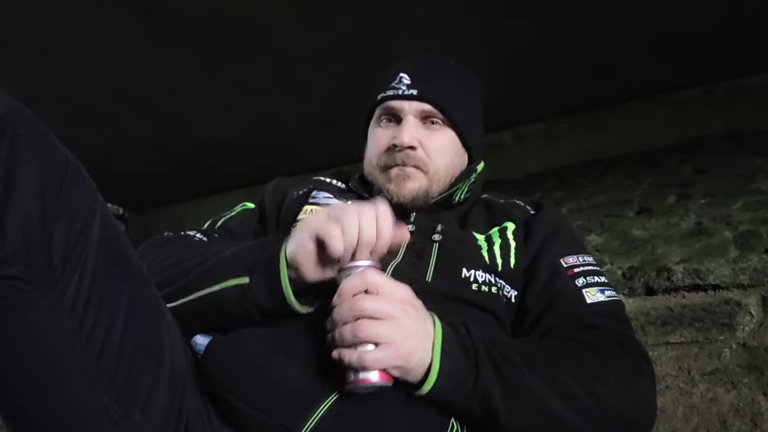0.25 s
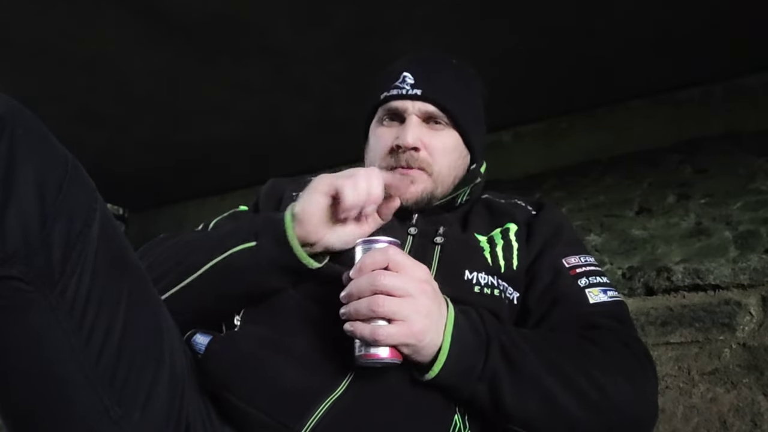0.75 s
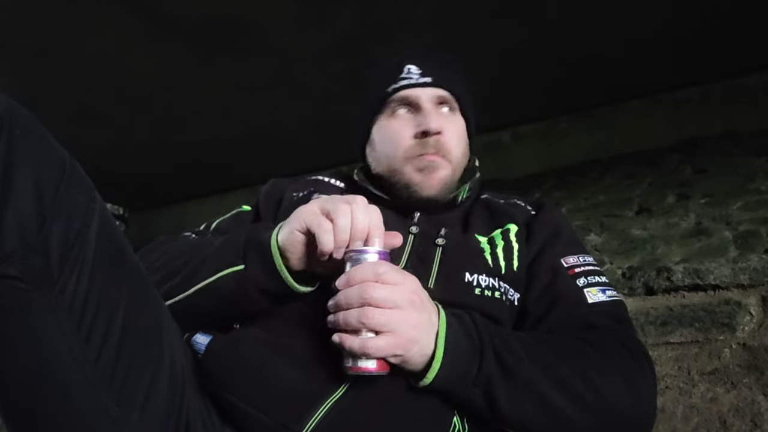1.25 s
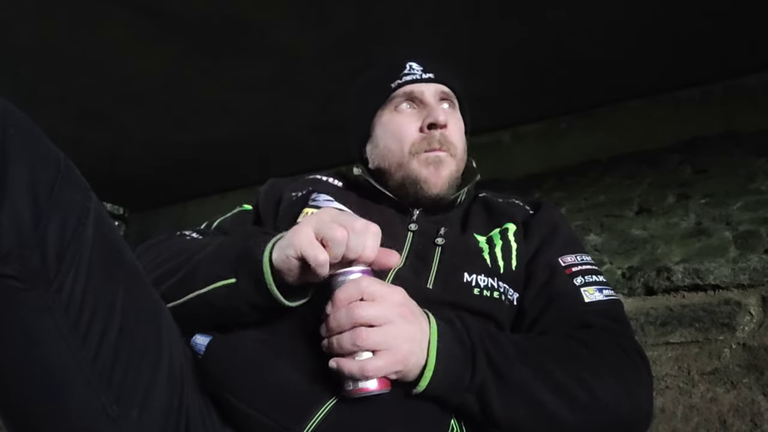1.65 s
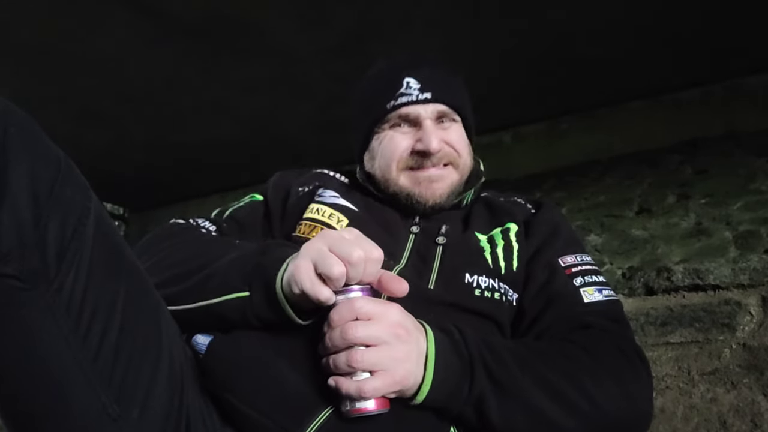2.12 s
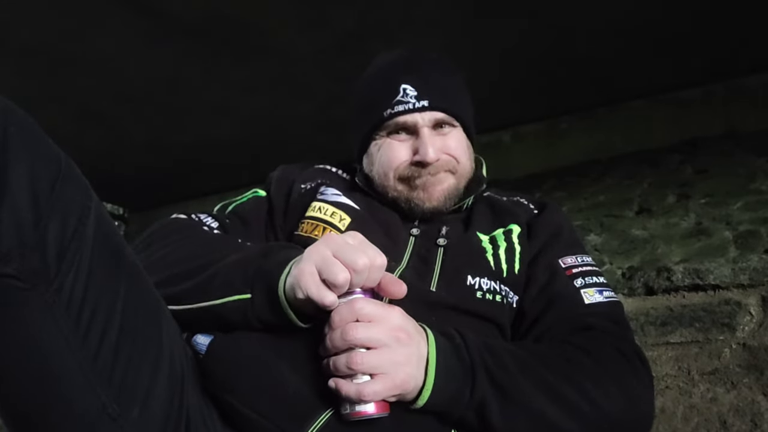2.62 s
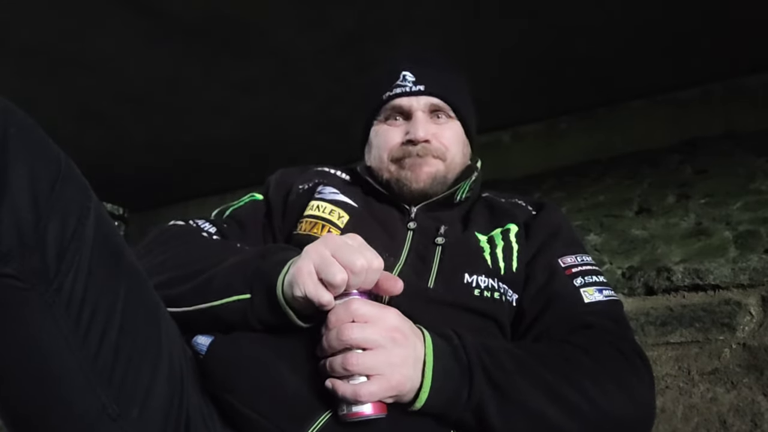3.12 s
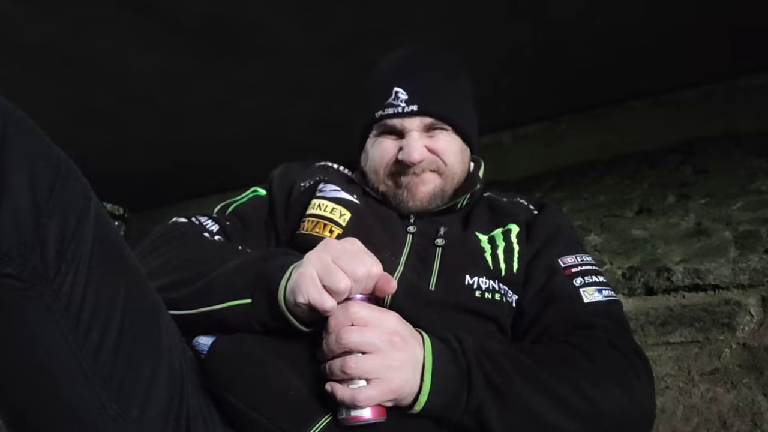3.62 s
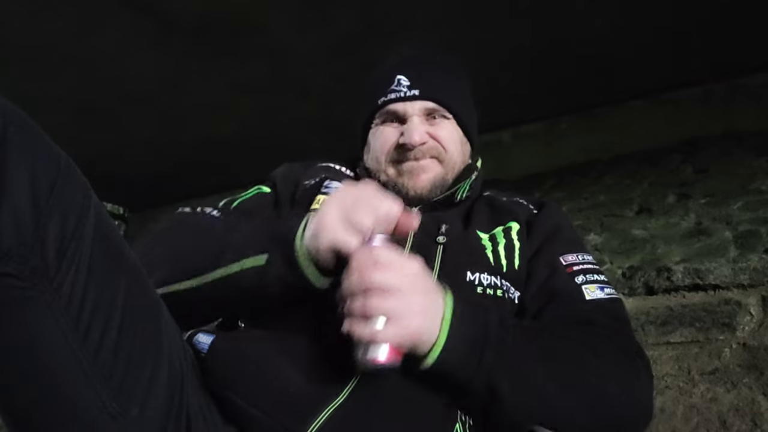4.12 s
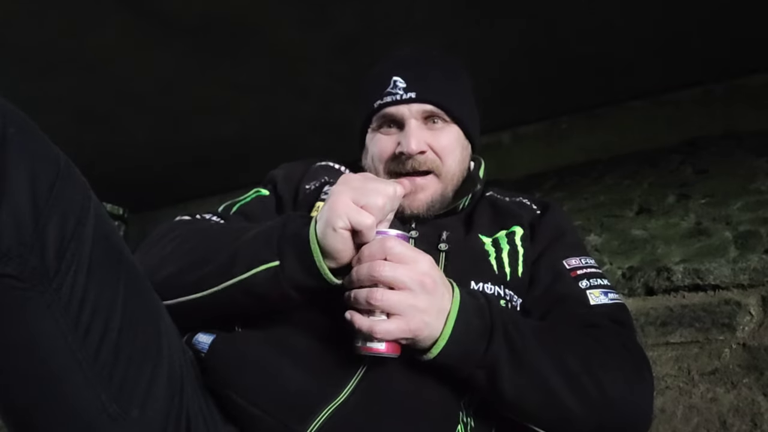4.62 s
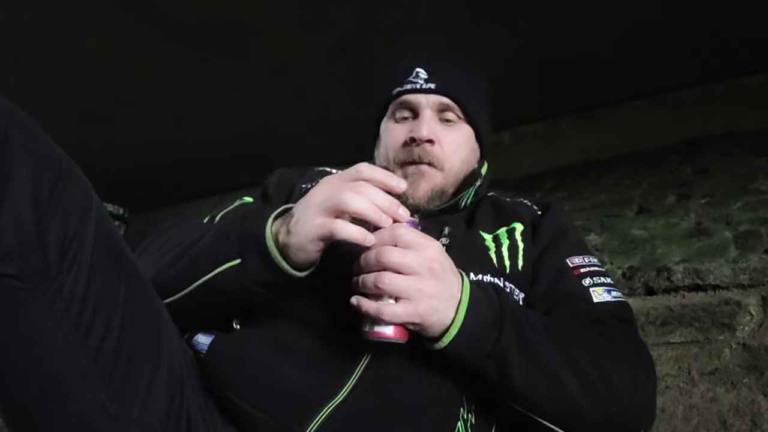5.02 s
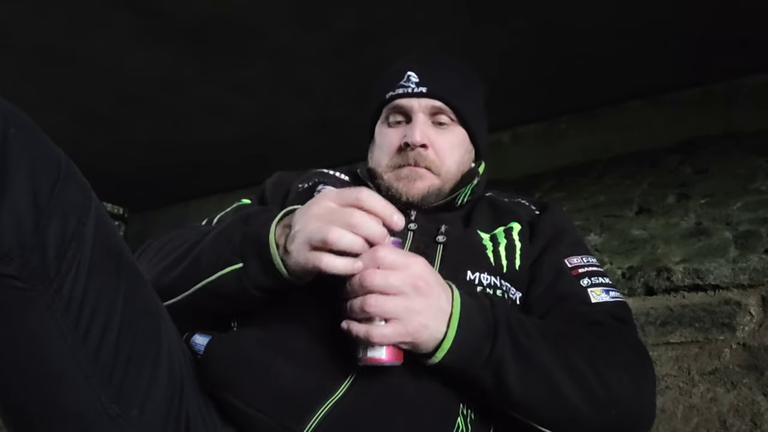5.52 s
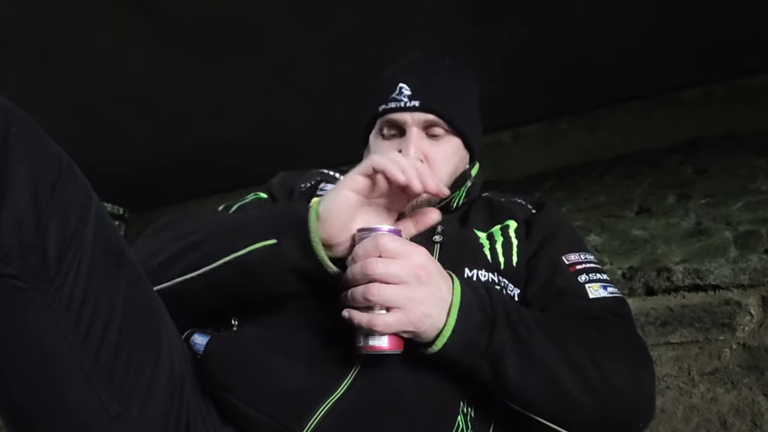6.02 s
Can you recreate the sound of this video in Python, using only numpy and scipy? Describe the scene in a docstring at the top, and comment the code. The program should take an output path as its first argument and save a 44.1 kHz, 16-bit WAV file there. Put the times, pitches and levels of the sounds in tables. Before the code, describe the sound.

Over a low road rumble and the soft tyre roar of a passing car, a drink can's tab clicks close by. A sharp crack releases a short, thin hiss. After a pause the lid ticks and tears open with a slightly hollow pop, followed later by a hard metallic snap. The cracks echo briefly off a concrete wall. Cloth brushes faintly as a second car passes. The sound is outdoor stereo, with the can near.

```python
"""Opening a can by a wall at night

An aluminium drink can is opened slowly by hand, close to a spaced pair of microphones.
The tab ticks, a sleeve brushes, the seal cracks and gas hisses out; the score line tears in a run
of snaps and the flap pops down. Each crack comes back off a concrete wall and dies in a short
bright tail. Behind the can, road traffic rumbles and two cars pass on roaring tyres."""
import sys
import numpy as np
from scipy import signal
from scipy.fft import rfft, irfft, next_fast_len
from scipy.io import wavfile
from scipy.ndimage import uniform_filter1d

SR = 44100
rng = np.random.default_rng(int(sys.argv[2]) if len(sys.argv) > 2 else 0)


def inscribe(sig):
    """Save sig as 16-bit PCM at rate SR to the path in sys.argv[1].

    A 1-D sig is mono; a 2-D sig holds one channel per row.
    Samples are clipped to [-1, 1] before scaling.
    """
    pcm = np.round(np.clip(np.atleast_2d(sig).T, -1, 1) * 32767)
    wavfile.write(sys.argv[1], SR, pcm.astype(np.int16))


N = 276066
TIME = np.arange(N) / SR
MIC_SPACING_M = 0.2
POP_S = 3.6198   # the flap breaks through


def from_db(db):
    """Decibels to gain."""
    return 10 ** (np.asarray(db) / 20)


def rms_one(x):
    """Scale to an rms of 1."""
    return x / np.sqrt(np.mean(x ** 2) + 1e-30)


def swells(strokes, edge_s):
    """Gain over time of strokes that each rise and fade around their middle."""
    return sum(from_db(db) * np.clip((length / 2 - np.abs(TIME - s)) / edge_s + .5, 0, 1)
               for s, length, db in strokes)


def at_hz(points, hz):
    """Read a table on a log-frequency axis."""
    table_hz, value = np.transpose(points)
    return np.interp(np.log(np.maximum(hz, 1)), np.log(table_hz), value)


def band(x, low_hz, high_hz, order=3):
    """Causal band-pass."""
    return signal.sosfilt(signal.butter(order, [low_hz, high_hz], "band", fs=SR, output="sos"), x)


def add(track, s, sound):
    """Mix a sound into the track at a time."""
    at = round(s * SR)
    track[:, at:at + sound.shape[-1]] += sound[:, :N - at]


def panned(x, right_db):
    """Lean a sound towards the right microphone."""
    return x * from_db([[-right_db / 2], [right_db / 2]])


def noise(spectrum, direct=0, count=N):
    """Coloured noise at the pair: a direct share alike in both, the rest arriving from all round."""
    size = next_fast_len(count)
    hz = np.maximum(np.arange(size // 2 + 1) * SR / size, 1)
    # the colour falls away steeply past both ends of its table
    skirts = np.minimum(1, np.minimum(hz / spectrum[0][0], spectrum[-1][0] / hz)) ** 6
    diffuse = np.sinc(2 * hz * MIC_SPACING_M / 343)
    alike = np.clip(direct + (1 - direct) * diffuse, -1, 1)
    mid, side = rfft(rng.standard_normal((2, size))) * from_db(at_hz(spectrum, hz)) * skirts
    left_right = np.sqrt(1 + alike) * mid + np.sqrt(1 - alike) * side * [[1], [-1]]
    return rms_one(irfft(left_right, size)[:, :count])


def resonant(hz, width_hz, channels=2):
    """Noise through one resonance, with an rms of 1."""
    white = rng.standard_normal((channels, N))
    return rms_one(band(white, hz - width_hz / 2, hz + width_hz / 2, order=2))


def evened(x, over_s=0.43):
    """Take the slow chance swings out of a noise."""
    return x / np.sqrt(uniform_filter1d((x ** 2).mean(axis=0), int(over_s * SR)))


# cars on the nearby road: (time when nearest [s], relative level [dB], time to fall by 3 dB [s])
CARS = [(.55, -53, 0.51), (6.05, -47.5, 0.49)]
# traffic rumble at the wall: (frequency [Hz], relative spectral density [dB])
RUMBLE_COLOUR = [(20, -32.5), (28, -29.5), (36, -9.5), (47, -10.5), (55, -0.5), (64, 0), (80, -5.5),
                 (110, -5.5), (135, -12), (175, -16.5)]
# swells of one deep note in the rumble: (middle [s], length [s], level [dB])
BOOMS = [(.2, 0.23, -40), (.63, .13, -43), (1.72, 0.46, -44), (2.5, 0.29, -37), (3.45, .3, -40.5),
         (4.35, 0.11, -37.5), (5.25, 0.32, -43.5)]
# tyre roar from the road: (frequency [Hz], relative spectral density [dB])
TYRE_COLOUR = [(130, -15), (190, -8), (225, 1.5), (270, -1), (370, -8.5), (600, -10.5), (800, -7),
               (1250, -13), (2000, -21), (3000, -32.5), (5500, -41.5), (7500, -54.5)]


def road(far_tyres_db=-55.5, tyre_boost_db=7.0, rumble_db=-44.5, rumble_follows=0.41):
    """Traffic rumbles and booms in the concrete; tyre roar follows the distance of each car."""
    passing = np.sqrt(sum(from_db(db) ** 2 / (1 + ((TIME - s) / width_s) ** 2)
                          for s, db, width_s in CARS))
    far = from_db(far_tyres_db)   # steady traffic further off
    roar = np.hypot(passing, far)
    rumble = from_db(rumble_db) * (roar / far) ** rumble_follows * evened(noise(RUMBLE_COLOUR))
    boom = swells(BOOMS, edge_s=.1) * evened(resonant(hz=54, width_hz=6.7, channels=1))
    tread = from_db(-3) * passing * resonant(hz=820, width_hz=160)   # near tyres sing
    tyres = from_db(tyre_boost_db) * roar * noise(TYRE_COLOUR)
    return rumble + boom, tyres + tread


# the microphones' noise floor: (frequency [Hz], relative spectral density [dB])
HISS_COLOUR = [(500, 0), (3000, 0), (5000, -1), (6500, -3), (7600, -8), (8200, -16), (11000, -15),
               (16000, -16)]


def mic_hiss(level_db=-68.5):
    """The microphones add a faint, steady hiss of their own."""
    return from_db(level_db) * noise(HISS_COLOUR)


# modes of the lid, heard close: (frequency [Hz], relative level [dB], t60 [s])
LID_MODES = [(1530, -7.5, 0.013), (2200, -4, .011), (2860, -8.5, .009), (3230, -7.5, 0.0063),
             (3680, -4.5, 0.017), (4440, -8.5, .014), (4740, -8.5, .009), (5640, -8.5, 0.0086),
             (6640, -7, 0.015), (7420, -9.5, 0.011), (9700, -13.5, 0.0081), (11270, -6.5, 0.015),
             (12300, -5.5, 0.0071), (13260, -3.5, 0.009), (15100, -7, .008)]


def snap(band_db, notes_hz, notes_t60, crackle_db, note_db=7.0, tick_db=5.5, crackle_t60=0.015):
    """The metal gives way at once, crackles for a moment, and sets the lid ringing."""
    t = np.arange(SR // 12) / SR
    # a few notes stand out; they move with the pressure under the lid and the bend of the tab
    notes = [(hz, note_db, notes_t60) for hz in notes_hz]
    hz, mode_db, t60 = np.array(LID_MODES + notes).T[:, :, None]
    # each mode reaches the two microphones with a strength and phase of its own
    strength_db = rng.normal(0, 1.2, (2, len(hz), 1))
    phase = rng.choice([-.55, .55], (len(hz), 1)) * np.array([1, -1])[:, None, None]
    decay = from_db(mode_db + strength_db - 60 * t / t60)
    sound = (decay * np.sin(2 * np.pi * hz * t + phase)).sum(axis=1)
    sound += from_db(crackle_db - 60 * t / crackle_t60) * rng.standard_normal((2, len(t)))
    sound[:, 0] += from_db(tick_db)
    # the place and speed of the break set the share of body, crack and edge
    edges_hz = [1600, 3000, 8500, 16000]
    parts = []
    for db, low, high in zip(band_db, edges_hz, edges_hz[1:]):
        part = band(sound, low, high, order=2)
        rms_in_5_ms = np.sqrt((part ** 2).sum(axis=1, keepdims=True) / (.005 * SR))
        parts.append(from_db(db) * part / rms_in_5_ms)
    body, crack, edge = parts
    return body - crack + edge   # the middle band is inverted so the three join without a notch


# single snaps of tab and lid, close to the pair: (time [s], body [dB], crack [dB], edge [dB],
# notes [Hz], t60 of the notes [s], extra level thrown at the wall [dB])
SNAPS = [(0.2322, -38.5, -40, -67, (2140, 4540, 5860), 0.018, -1), (1.2095, -80, -63, -86, (1900, 4400),
         0.01, 0), (2.2125, -26.5, -18, -29.5, (3150, 4430, 6160), 0.011, -1),
         (3.3401, -54.5, -56, -80, (2700, 3750, 5200), 0.01, 7.5),
         (3.3685, -44.5, -34.5, -39, (2600, 3800, 5450), 0.013, 6),
         (3.381, -41.5, -27.5, -24, (2600, 5380, 13800), 0.007, -4.5),
         (3.501, -66.5, -51.5, -61.5, (2550, 3700), 0.01, 7.5), (3.515, -54, -54, -47.5, (3400, 5400),
         0.007, -1.5), (4.801, -52, -41.5, -65, (4080, 4160), 0.059, -4),
         (5.2778, -12.5, -18.5, -31, (2320, 5200), 0.0074, 3), (5.546, -59, -67, -67, (5300, 7000),
         0.01, 4)]


def lid(near_crackle_db=-6.0, thrown_crackle_db=12.0):
    """Every snap and the pop of the flap, straight to the microphones and back off the wall."""
    near, thrown = np.zeros((2, 2, N))
    for s, *band_db, notes_hz, t60, wall_db in SNAPS + tear():
        add(near, s, snap(band_db, notes_hz, t60, near_crackle_db))
        # summed over all directions the notes stand out less from the crackle
        add(thrown, s, from_db(wall_db) * snap(band_db, notes_hz, t60, thrown_crackle_db))
    for track in (near, thrown):
        add(track, POP_S, flap_thump())
    return near + concrete(thrown)


# reflections off the concrete: (delay [s], level [dB])
WALL_ECHOES = [(0.0148, -20), (0.0169, -20.5), (0.0285, -31), (.0338, -24.5), (.127, -43)]
# decay of the reverberation beside the wall: (frequency [Hz], t60 [s])
TAIL_T60 = [(500, .75), (2200, .66), (5000, .56), (9000, .41), (15000, .33)]
# colour of that reverberation: (frequency [Hz], relative spectral density [dB])
TAIL_COLOUR = [(400, -2.5), (1700, 0), (2100, -7), (2650, 2.5), (3150, -3), (3650, 4), (4400, 1.5),
               (5000, 0.5), (6000, -4.5), (7000, 0), (8700, -10.5), (11000, 1.5), (16000, 2.5)]


def concrete(x, tail_db=-16.0, onset_s=0.015, build_s=0.011):
    """The wall returns a few hard reflections and a diffuse tail whose treble dies first."""
    t = np.arange(SR) / SR
    edges_hz = np.geomspace(300, 17000, 11)
    tail = np.zeros((2, SR))
    for low, high in zip(edges_hz, edges_hz[1:]):
        t60 = at_hz(TAIL_T60, np.sqrt(low * high))
        tail += band(noise(TAIL_COLOUR, count=SR), low, high) * from_db(-60 * t / t60)
    build = np.clip((t - onset_s) / build_s, 0, 1)
    response = from_db(tail_db) * rms_one(tail * build) / np.sqrt(SR)
    for delay, db in WALL_ECHOES:
        # slanting arrivals reach the two microphones at slightly different times
        at = np.round((delay + rng.uniform(-.0001, .0001, 2)) * SR).astype(int)
        response[[0, 1], at] += from_db(db)
    return signal.fftconvolve(x, response, axes=-1)[:, :N]


# brushes of the hand at the can: (middle [s], length [s], level [dB])
BRUSHES = [(1.73, .12, -79), (4.57, .16, -79.5), (4.9, .17, -74.5), (5.63, .16, -75.5), (5.89, 0.18, -77.5),
           (6.13, .16, -64)]
# rubbing cloth, heard close: (frequency [Hz], relative spectral density [dB])
CLOTH_COLOUR = [(2000, -2), (4500, -6.5), (7500, -6), (8800, -12), (11500, -4), (15500, -9)]


def sleeve():
    """Sleeve and fingers brush softly as the hand shifts."""
    return swells(BRUSHES, edge_s=0.049) * noise(CLOTH_COLOUR, direct=0.22)


# the gas jet, heard close: (frequency [Hz], relative spectral density [dB])
JET_COLOUR = [(1500, -29.5), (2600, -19), (3300, -19.5), (4600, -19.5), (5800, -14), (6900, -15),
              (7800, -8.5), (8800, -16), (9600, -14.5), (10400, -14.5), (12250, -10), (12900, -8.5),
              (14500, -1.5), (16000, -2)]


def gas(start_s=2.215, attack_s=0.096, hold_until_s=2.517, level_db=-34.5, fall_db_per_s=273):
    """A thin, bright jet through the first slit builds, holds, and falls as the pressure runs out."""
    opening = np.clip((TIME - start_s) / attack_s, 0, 1)
    flow = opening * from_db(level_db - fall_db_per_s * np.maximum(TIME - hold_until_s, 0))
    jet = noise(JET_COLOUR, direct=.25)
    # the slit whistles faintly while it is still narrow, fading by 60 dB in 1.5 s
    narrow = from_db(-3 - 60 * np.abs(TIME - start_s) / 1.5)
    whistle = narrow * resonant(hz=12200, width_hz=450)
    return flow * (jet + whistle)


# body, crack and edge of a slip in the score line, a row each:
# (level at the pop [dB], rise before it [dB/s], fall after it [dB/s])
TEAR_BANDS = [(-24.5, 1100, 150.5), (-28, 849.5, 1001.5), (-27, 1349.5, 1601)]


def tear(start_s=3.595, end_s=3.626, count=9, crowding=0.68, jitter_s=.0004):
    """The score line slips in a run of snaps: louder up to the pop, duller as the flap swings in."""
    notes_hz, notes_t60, wall_db = (2630, 3900, 5730), 0.0057, -2
    times = start_s + (end_s - start_s) * np.linspace(0, 1, count) ** crowding   # below 1 speeds up
    top_db, rise, fall = np.transpose(TEAR_BANDS)
    slips = []
    for s in times:
        band_db = top_db - rise * max(POP_S - s, 0) - fall * max(s - POP_S, 0)
        slips.append((s + rng.normal(0, jitter_s), *band_db, notes_hz, notes_t60, wall_db))
    return slips


# modes of the can's body, heard close: (frequency [Hz], relative level [dB], t60 [s])
CAN_MODES = [(470, -2, 0.054), (720, -2.5, 0.017), (1100, 2.5, 0.013), (1470, -3, 0.01), (1656, -4.5, 0.19)]


def flap_thump(level_db=-32):
    """The flap breaks through and draws a hollow knock from the can's wall and headspace."""
    t = np.arange(SR // 5) / SR
    hz, mode_db, t60 = np.array(CAN_MODES).T[:, :, None]
    decay = from_db(level_db + mode_db - 60 * t / t60)
    return (decay * np.sin(2 * np.pi * hz * t)).sum(axis=0, keepdims=True)


def scene():
    """The can close by and a little to the right, the road behind, a faint hiss under all."""
    rumble, tyres = road()
    traffic = panned(rumble, right_db=2.5) + panned(tyres, right_db=0.5)
    hand = panned(sleeve(), right_db=0.3)
    hiss = mic_hiss()
    can = panned(lid(), right_db=2.0) + panned(gas(), right_db=0.3)
    return traffic + hiss + hand + can


def record(dry, ceiling=.95, cutoff_hz=15780):
    """The highest peaks are flattened and the top of the treble is cut steeply."""
    low_pass = signal.ellip(12, .1, 70, cutoff_hz, fs=SR, output="sos")
    return signal.sosfilt(low_pass, np.clip(dry, -ceiling, ceiling))


dry = scene()
out = record(dry)
inscribe(out)
```